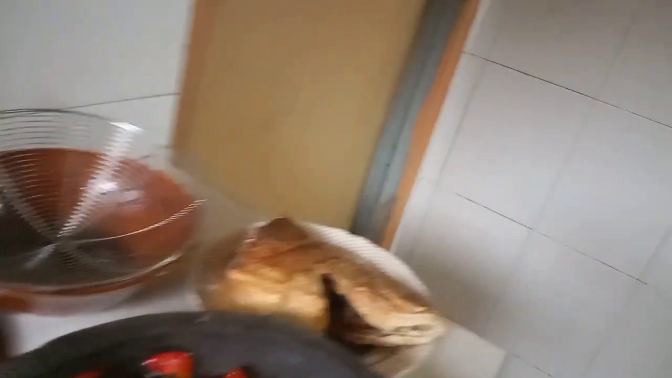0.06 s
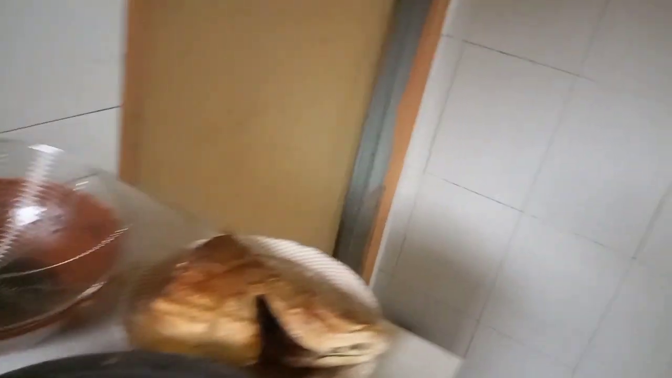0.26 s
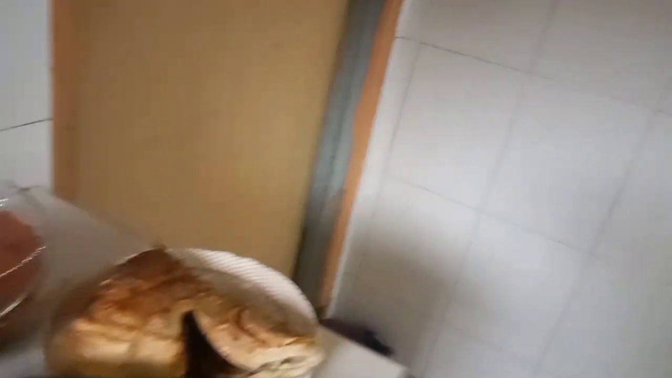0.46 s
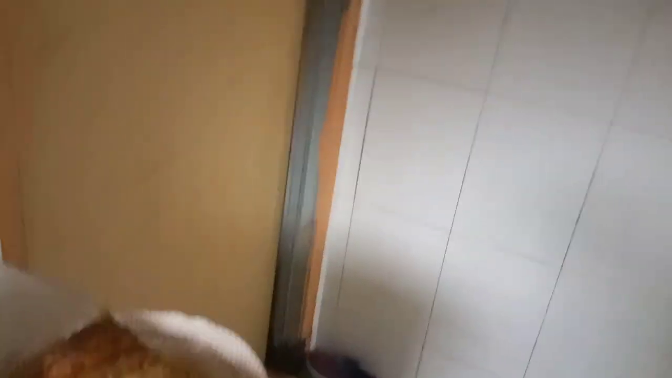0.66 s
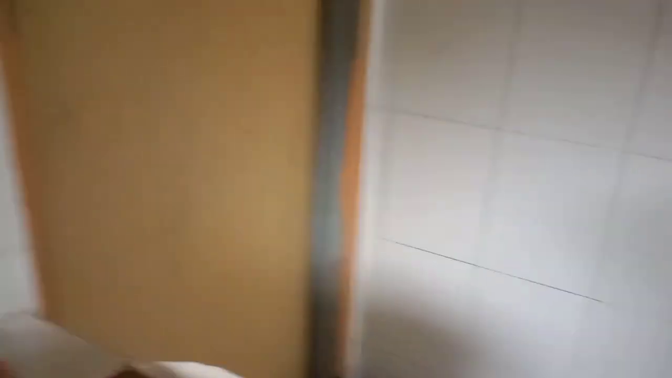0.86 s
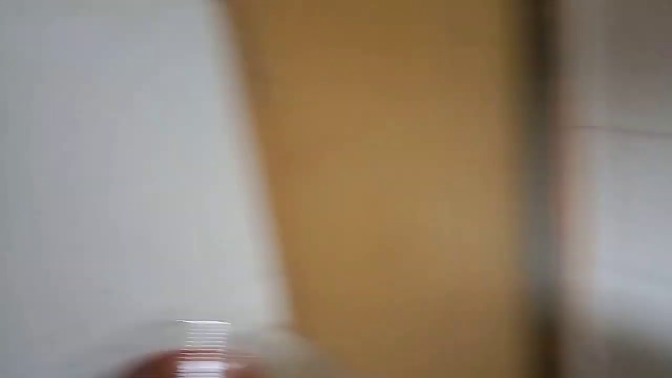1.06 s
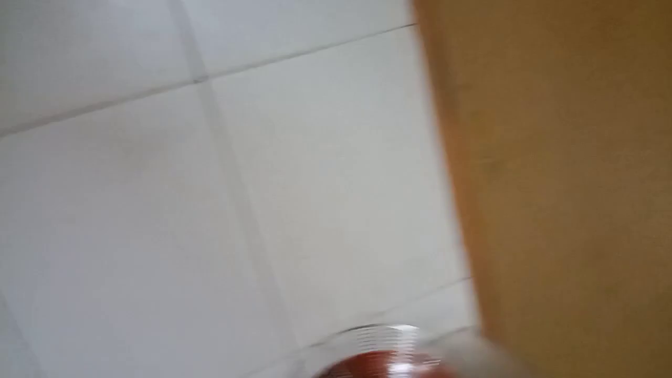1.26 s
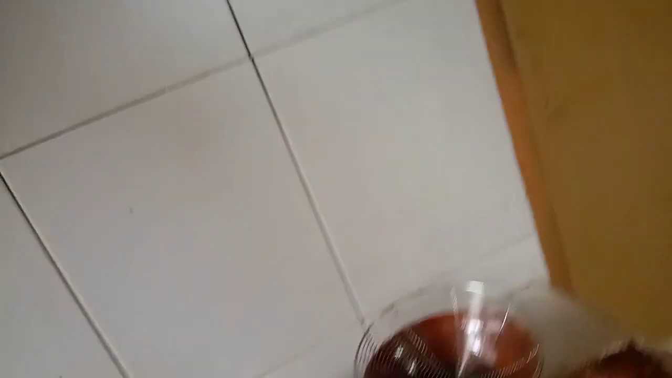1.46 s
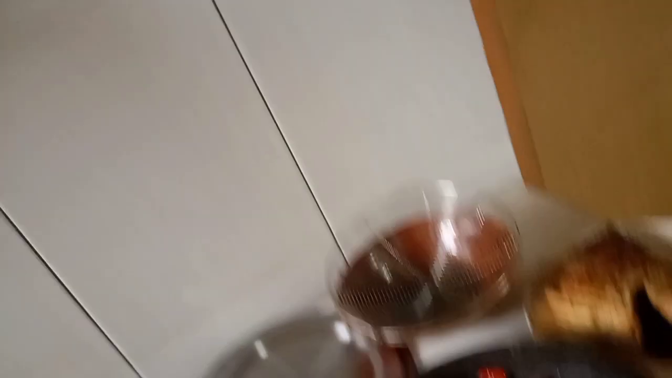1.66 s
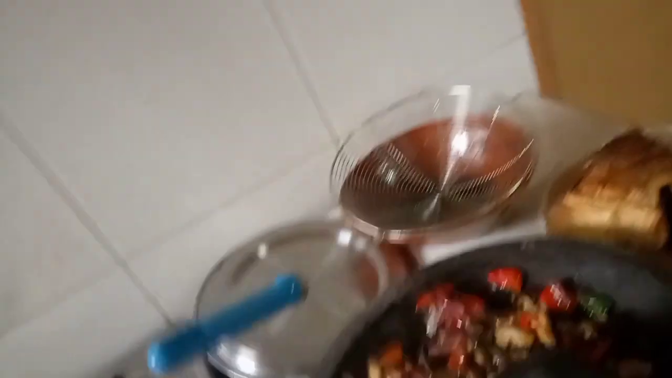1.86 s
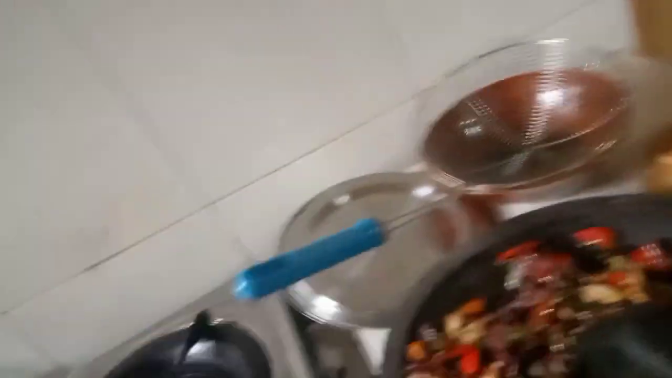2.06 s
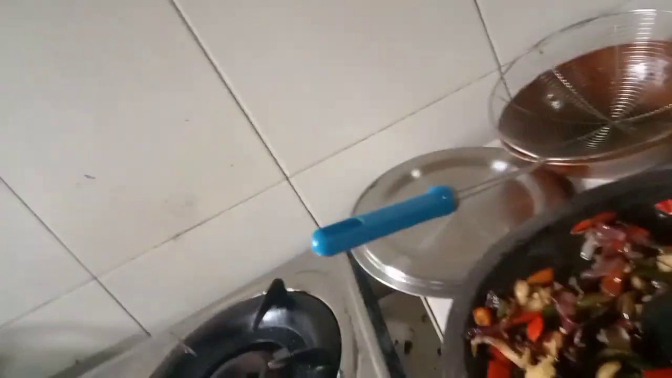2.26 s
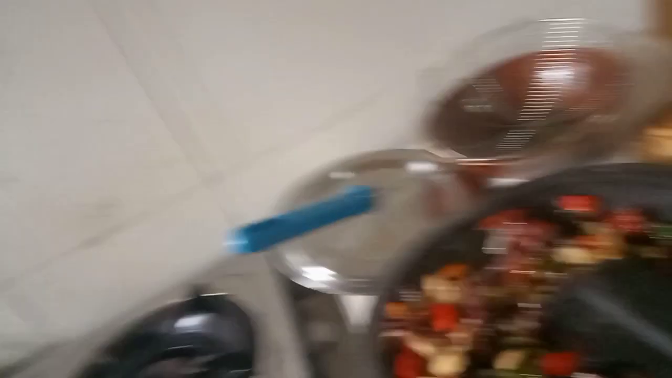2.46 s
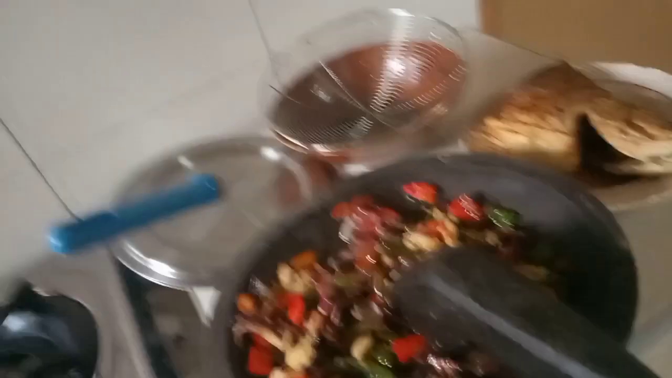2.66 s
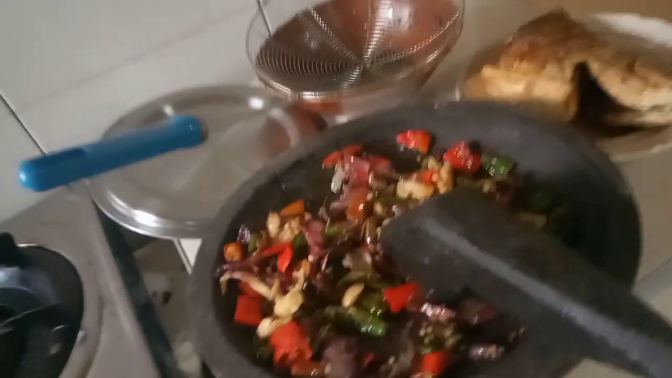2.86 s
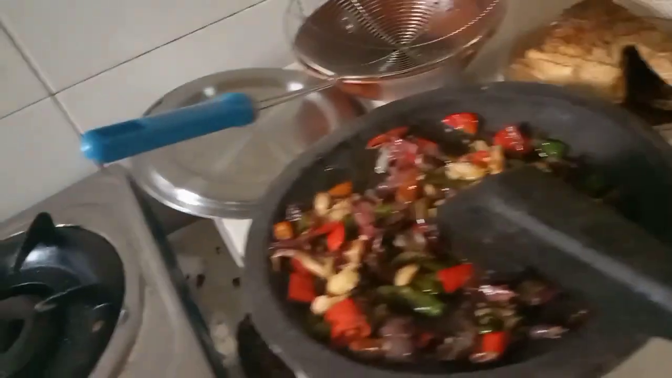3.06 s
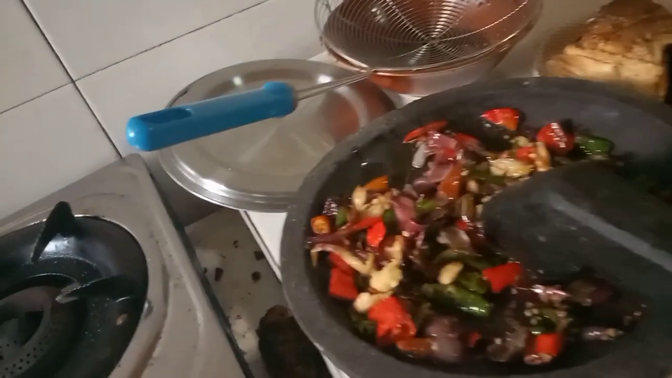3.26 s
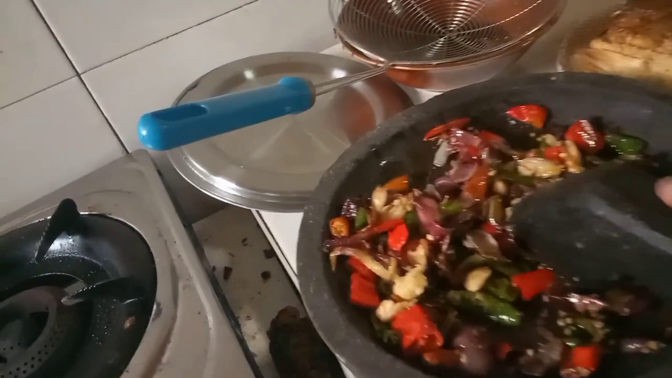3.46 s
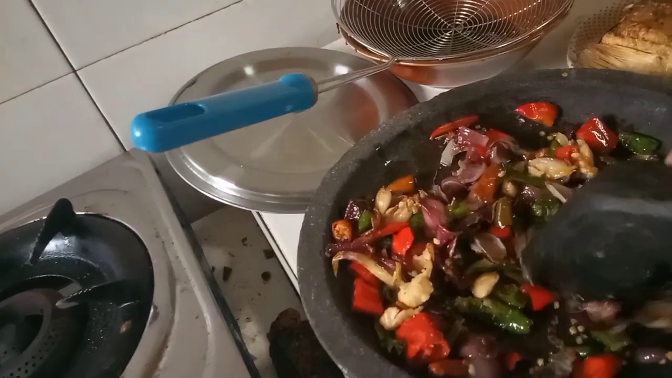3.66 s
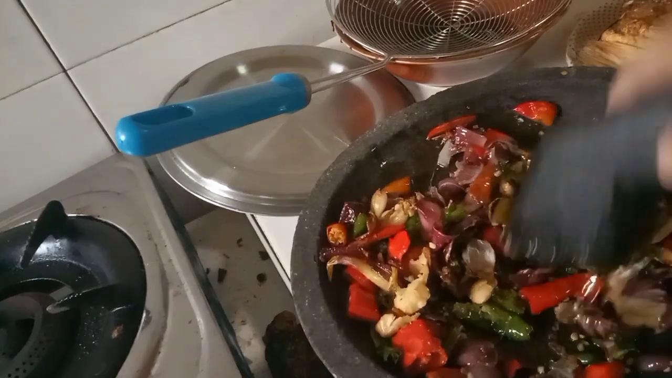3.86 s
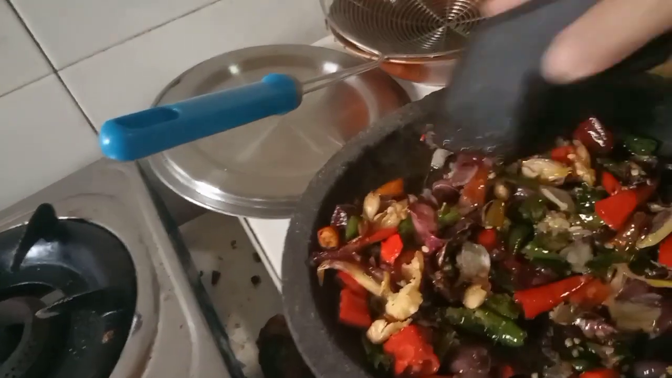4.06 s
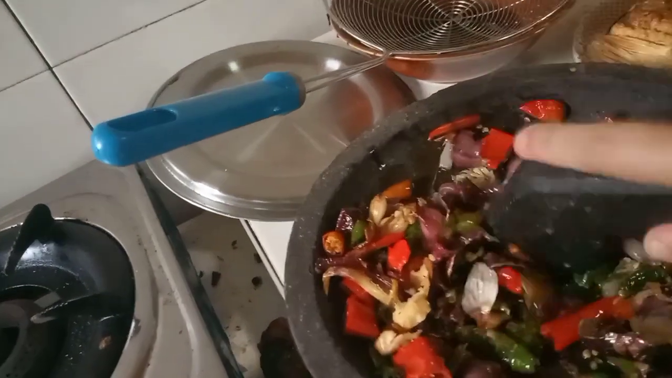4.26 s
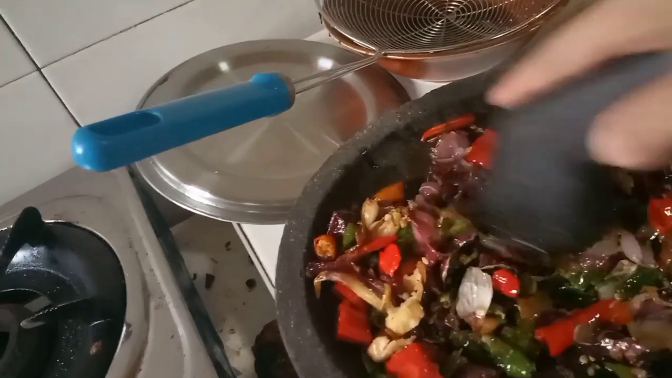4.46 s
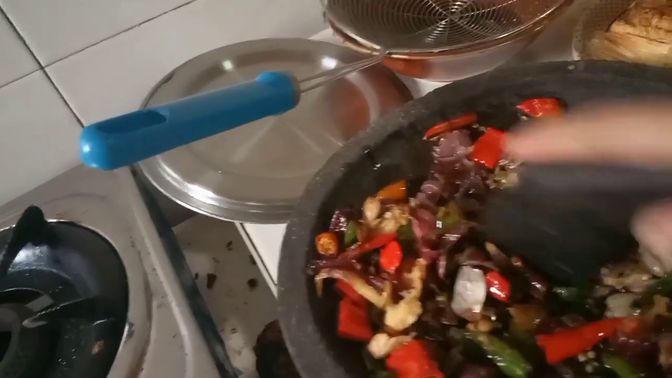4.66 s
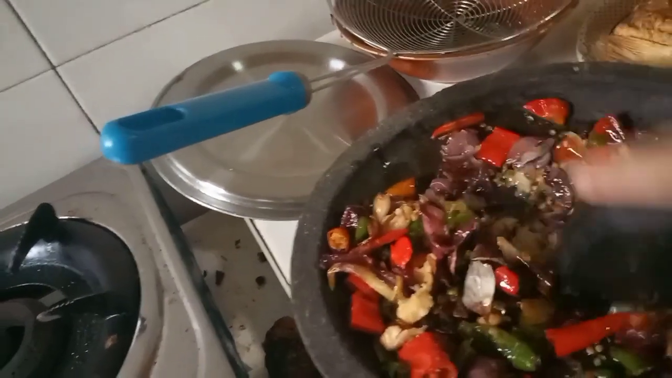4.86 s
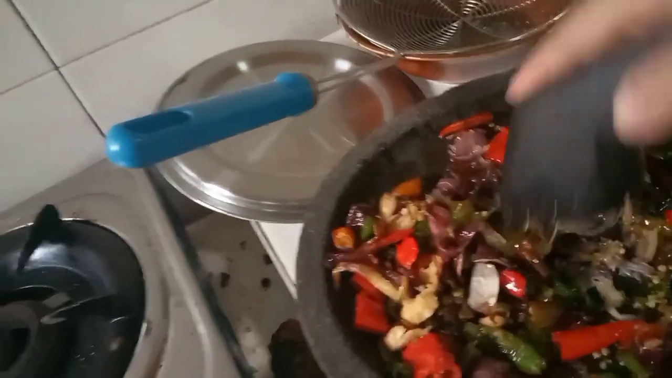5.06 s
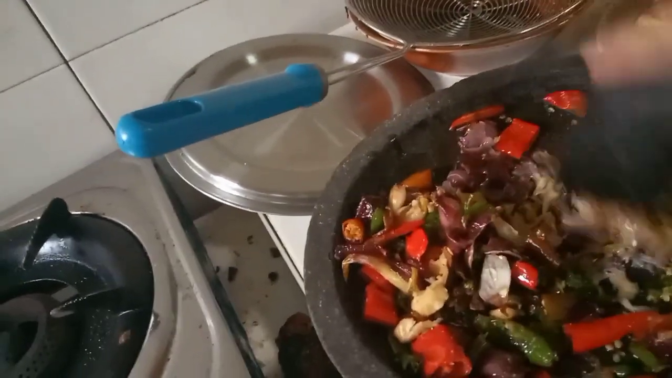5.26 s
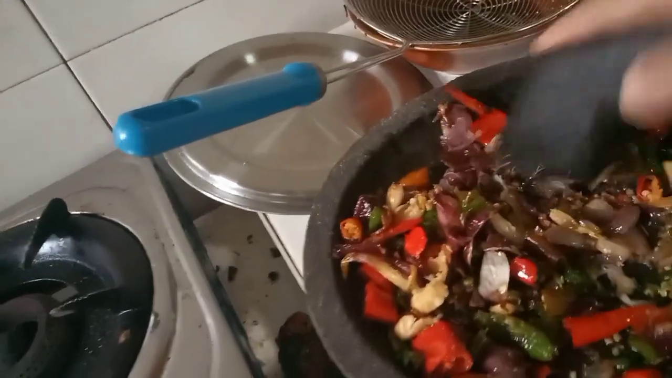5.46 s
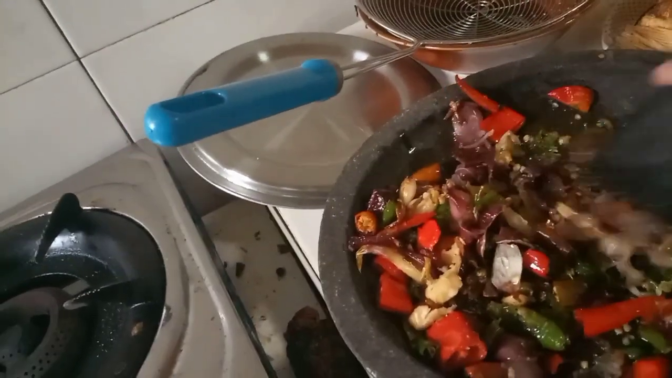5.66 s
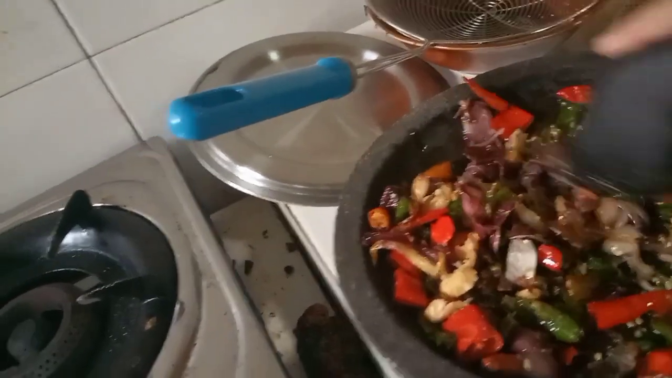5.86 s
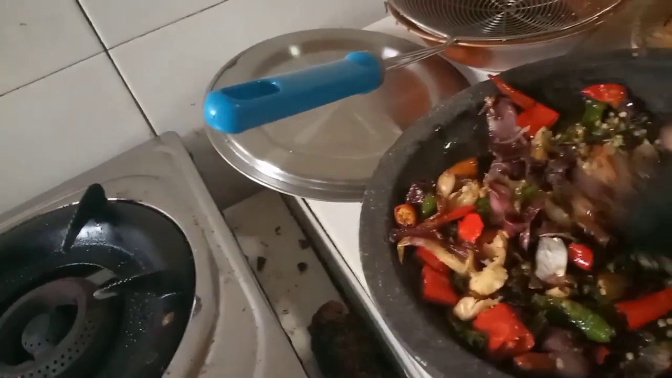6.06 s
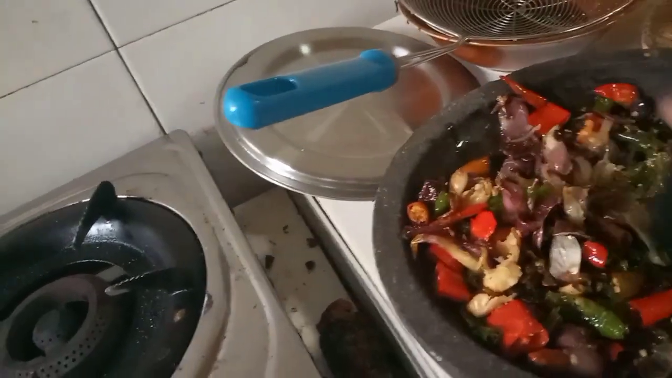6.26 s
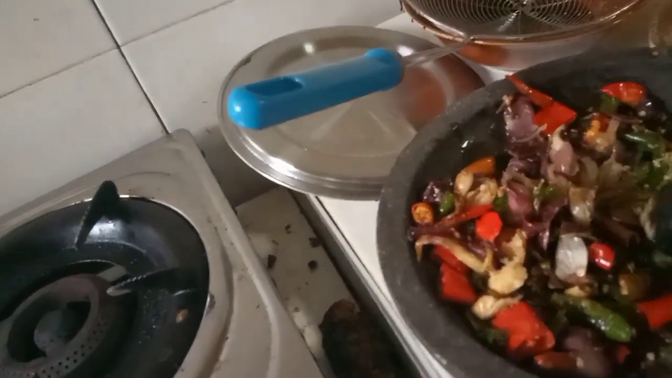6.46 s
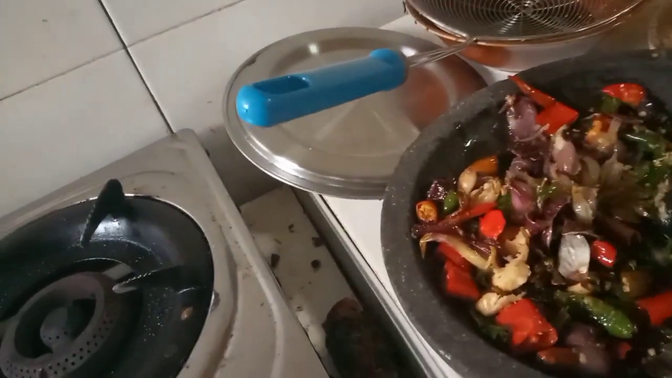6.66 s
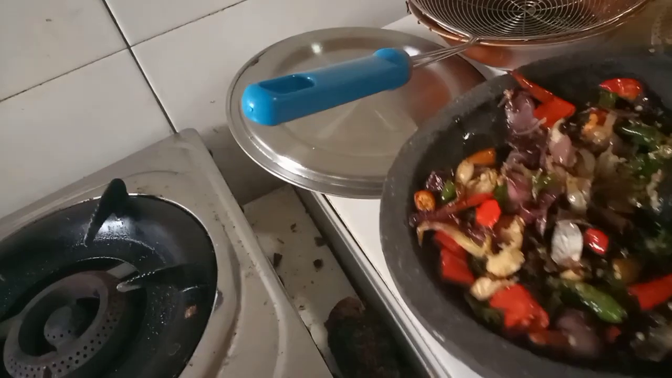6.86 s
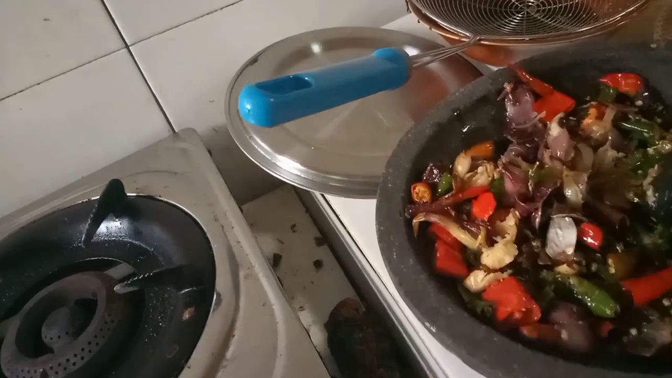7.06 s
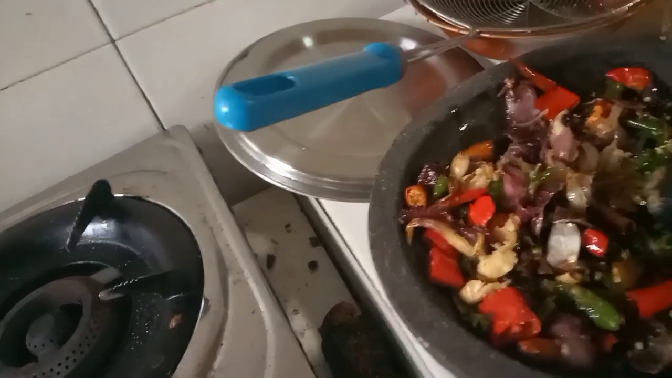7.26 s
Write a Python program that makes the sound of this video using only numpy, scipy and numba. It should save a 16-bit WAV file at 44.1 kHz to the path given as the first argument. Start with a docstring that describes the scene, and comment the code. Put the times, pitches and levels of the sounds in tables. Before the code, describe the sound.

Footsteps slap on tiles, then wet crackling crushing and gritty stone scraping build in a mortar, closing with one loud, ringing stone blow.

```python
"""A small tiled kitchen, heard close up by a phone: a stone pestle crushes chilies and shallots in a stone mortar.
Sandals first clap on the tiles (noise bursts) and heels thump through the floor (decaying sines).
Then skins crack and paste squelches in filtered random grains, while stone drags and knocks on stone
and excites the decaying modes of mortar and counter. The hard walls add a diffuse tail and a low boom,
over faint hiss, rustle and rumble (filtered noise)."""
import sys
import numpy as np
from scipy import signal
from scipy.fft import rfft, irfft
from scipy.io import wavfile
from scipy.ndimage import uniform_filter1d
from numba import njit

SR = 44100
rng = np.random.default_rng(int(sys.argv[2]) if len(sys.argv) > 2 else 0)


def pcm_store(signal):
    """Save signal as 16-bit PCM."""
    levels = np.round(np.clip(np.atleast_2d(signal), -1, 1) * 32767)
    wavfile.write(sys.argv[1], SR, levels.astype(np.int16).T)


N = 322016
T = np.arange(N) / SR

# one table per stroke of the pestle, levels gliding from row to row: time_s, crush_db (paste),
# drag_db (stone on stone), contact_hz, thrust_db (into the counter), boom_db (of the kitchen)
STROKES = [
    [(4.13, -80.5, -84, 1130, -84, -76), (4.162, -59, -83.5, 656, -85, -91),
     (4.182, -58.5, -65, 607, -82, -66), (4.218, -46, -49, 577, -63, -52), (4.242, -40, -57, 655, -60, -75),
     (4.268, -38.5, -61, 1280, -69, -50), (4.3, -52, -64.5, 1210, -69, -70),
     (4.32, -50, -71.5, 991, -49, -55)],
    [(4.32, -53.5, -72, 1110, -60, -54), (4.352, -51.5, -76, 1213, -62, -46.5),
     (4.368, -35.5, -64, 1240, -59, -59), (4.384, -42.5, -77, 566, -63, -59),
     (4.414, -50.5, -76, 535, -59, -55), (4.44, -40.5, -47.5, 535, -48, -48),
     (4.492, -62, -46.5, 596, -49.5, -41), (4.53, -59.5, -53.5, 598, -61, -73)],
    [(4.53, -54, -61, 565, -65, -63), (4.57, -44, -70, 1505, -52, -62), (4.59, -29, -53.5, 1510, -66, -63),
     (4.63, -41.5, -47, 1440, -47, -56), (4.698, -40.5, -56, 949, -47, -45.5),
     (4.708, -35.5, -39, 1090, -59, -58), (4.754, -53.5, -45, 746, -54, -70),
     (4.86, -71, -71, 565, -69, -73)],
    [(4.86, -69, -69, 1073, -65, -72), (4.906, -37.5, -59, 910, -48, -44.5),
     (4.942, -39.5, -32.5, 940, -41.5, -46), (5.004, -38.5, -41.5, 837, -44, -41),
     (5.038, -41.5, -37, 536, -40, -56), (5.096, -62.5, -44.5, 610, -43.5, -52),
     (5.158, -70, -70, 528, -81, -77), (5.2, -66.5, -81, 1050, -76, -57)],
    [(5.2, -64, -82, 1120, -70, -84), (5.24, -45, -32, 1150, -30.5, -29),
     (5.304, -33.5, -26, 675, -33, -34.5), (5.354, -37.5, -39, 775, -35, -46),
     (5.408, -35.5, -32.5, 1140, -33.5, -46), (5.446, -34, -41.5, 770, -42, -65),
     (5.484, -43, -31.5, 560, -38, -59), (5.58, -66, -55, 646, -66, -57)],
    [(5.58, -58.5, -55.5, 570, -56, -73), (5.638, -46, -59.5, 522, -61, -47),
     (5.698, -38, -63, 969, -51, -52), (5.738, -40.5, -35, 970, -49, -37),
     (5.794, -42.5, -43, 546, -43, -37.5), (5.826, -50.5, -31.5, 550, -41, -37.5),
     (5.902, -66, -63.5, 573, -52, -74), (6.0, -80, -85, 998, -68, -78)],
    [(6.0, -76, -95, 944, -69, -71), (6.02, -18, -42, 932, -51, -58), (6.04, -43.5, -30, 890, -37, -52),
     (6.08, -32.5, -33.5, 1020, -29, -46), (6.106, -28, -31, 990, -34.5, -50),
     (6.156, -38, -35.5, 659, -32.5, -34.5), (6.23, -41.5, -45, 725, -49, -42.5),
     (6.3, -69, -71, 588, -61, -59)],
    [(6.3, -81.5, -71, 771, -66, -61), (6.328, -27, -70, 905, -43, -57), (6.342, -40.5, -42, 935, -49, -42),
     (6.378, -45.5, -34.5, 930, -35.5, -35.5), (6.452, -59.5, -52.5, 621, -43, -58),
     (6.498, -70, -81, 622, -69, -75), (6.532, -64.5, -77, 1060, -68, -82), (6.56, -79, -75, 983, -63, -53)],
]
# stone meeting stone: contact_s, peak_db, tilt_db_per_octave (hardness), counter_db (relative)
KNOCKS = [(4.184, -43.5, -3, -11), (4.43, -35, -9, -5), (4.586, -55, -23, -9.0), (4.706, -29.5, 13.5, -21),
          (4.739, -28.5, -10.5, -12), (4.912, -36.5, -4, -15), (4.94, -31.5, -4.5, -0.5),
          (5.041, -37, -11, -8), (5.229, -32.5, -3, 10), (5.278, -23, -1, -8), (5.297, -27, -7.5, -5),
          (5.398, -26, -5.5, -9.5), (5.473, -28.5, 0, -1.5), (5.719, -35, -5.5, -16.5),
          (5.817, -37.5, -12, -14.5), (6.022, -20.5, 3.5, -18), (6.343, -36.5, -5, -12),
          (6.359, -32.5, -5.5, -13), (6.583, -2, 0, -18.5)]
# heels on the floor: start_s, peak_db, pitch_hz, overtone_share
THUMPS = [(1.92, -30.5, 89.7, 0.46), (1.949, -34, 144.4, 0.73), (2.057, -38, 97, 1),
          (2.265, -44.5, 75.4, 0.57), (2.756, -31, 100.2, 0.22), (2.844, -34.5, 85.5, 0.39)]
# decaying modes of the mortar: mode_hz, level_db (relative), t60_s
MORTAR_MODES = [(539, -4, 0.063), (630, 1, 0.01), (810, -13.5, 0.051), (1101, 1, .04), (1005, 8.5, 0.052),
                (1230, -4.5, 0.048), (1299, -8.5, 0.13), (1540, -8, 0.035), (1915, -10.5, 0.073),
                (2260, -40, .04), (3140, -23, .06), (4330, -28, .3)]
# decaying modes of the counter: mode_hz, level_db (relative), t60_s
COUNTER_MODES = [(69, -7, 0.11), (116.5, 2, 0.058), (141, -1.5, 0.087), (195, -4.5, 0.19),
                 (269, -3.5, 0.07), (315, -4.5, 0.083), (350.4, -5.5, 0.047)]
# spectrum of the wet paste: frequency_hz, density_db (per Hz, relative)
PASTE_SPECTRUM = [(880, -28), (1500, -3), (1820, -11), (2180, -13.5), (2770, -7), (3300, -3), (4160, -15),
                  (5370, -2.5), (7630, -3.5), (9000, -23.5), (11700, -31.5), (19800, -120)]
# spectrum of the sizzle in the high treble: frequency_hz, density_db (per Hz, relative)
SIZZLE_SPECTRUM = [(5290, -23), (9000, -1), (10300, -3.5), (13200, -8.5), (14900, 4.5), (16000, -21)]


def undb(db):
    """Level law: decibels to amplitude ratio."""
    return 10 ** (np.asarray(db) / 20)


def unit(x):
    """Power normalization: scale to rms 1."""
    return x / np.sqrt(np.mean(x ** 2))


def colour(x, spectrum):
    """Minimum-phase filtering: energy comes as early as the spectrum allows, so hits stay sharp."""
    hz, db = np.transpose(spectrum)
    size = 2 ** 11
    bin_hz = np.arange(size // 2 + 1) * SR / size
    log_gain = np.interp(np.log(bin_hz + 1), np.log(hz), db) * np.log(10) / 20
    # folding the cepstrum onto positive time makes the response causal
    cepstrum = irfft(log_gain)
    cepstrum[1:size // 2] *= 2
    cepstrum[size // 2 + 1:] = 0
    response = irfft(np.exp(rfft(cepstrum)))
    return signal.fftconvolve(x, response / np.sqrt(np.sum(response ** 2)))[:len(x)]


def tilted(spectrum, tilt_db, pivot_hz):
    """Spectral slope: lean a spectrum by dB per octave about a pivot."""
    return [(hz, db + tilt_db * np.log2(hz / pivot_hz)) for hz, db in spectrum]


def ring(force, modes):
    """Modal superposition: a struck body answers with the sum of its decaying modes."""
    t = T[T < max(t60 for _, _, t60 in modes)]
    response = np.zeros(len(t))
    for k, (hz, db, t60) in enumerate(modes):
        # neighbouring modes alternate in sign
        response += undb(db - 60 * t / t60) * np.sin(2 * np.pi * hz * t + np.pi * k)
    return signal.fftconvolve(force, response / np.abs(response).max())[:len(force)]


def band(x, hz, width_hz):
    """Simple resonance: one peak with Q = centre / width."""
    b, a = signal.iirpeak(min(hz, SR / 3), hz / width_hz, SR)
    return signal.lfilter(b, a, x)


@njit
def sweep(x, hz, q):
    """Moving resonance: a state-variable band-pass whose centre changes from sample to sample."""
    y, band_state, low_state = np.empty(len(x)), 0., 0.
    for i in range(len(x)):
        g = np.tan(np.pi * hz[i] / SR)
        v = (band_state + g * (x[i] - low_state)) / (1 + g * (g + 1 / q))
        band_state = 2 * v - band_state
        low_state = low_state + 2 * g * v
        y[i] = v / q
    return y


def grains(rate, scatter_db):
    """Shot noise: random clicks, rate per second, whose sizes have a long tail; rms 1."""
    when = rng.random(N) < rate / SR
    size = rng.exponential(1, N)
    sign = rng.standard_normal(N)
    return unit(when * sign * undb(scatter_db * np.minimum(size, 4.5)))


def walk(rate):
    """Slow random modulation: levels drawn rate times a second, smoothed twice; rms 1."""
    k = int(SR / rate)
    held = np.repeat(rng.standard_normal(N // k + 1), k)
    return unit(uniform_filter1d(uniform_filter1d(held, k), k)[:N])


def add(out, s, piece):
    """Linear superposition: lay a sound on the time line."""
    i = int(s * SR)
    out[i:i + len(piece)] += piece[:N - i]


def burst(x, decay_s, rise_s):
    """Transient envelope: exponential approach and exponential decay, peak 1."""
    t = T[:len(x)]
    shaped = x * (1 - np.exp(-t / rise_s)) * np.exp(-t / max(decay_s, 1e-4))
    return shaped / np.abs(shaped).max()


def pressing(column):
    """Applied load: one level column of the strokes as gain, negligible before and after them."""
    rows = np.concatenate(STROKES)
    return undb(np.interp(T, rows[:, 0], rows[:, column], left=-120, right=-120))


def quiet():
    """Background noise: flickering hiss and rustle, wavering boom and slow rumble; strokes swell the last two."""
    # boom of the kitchen and rumble of the hand on the phone: time_s, boom_db, rumble_db
    stir = [(0.0, -88, -99), (0.28, -76.5, -92), (0.34, -63.5, -83), (0.53, -55, -81), (0.65, -81, -83),
            (1.14, -70.5, -68), (1.4, -74.5, -85.5), (1.8, -82.5, -88), (2.05, -72, -62), (2.22, -67, -75),
            (2.38, -60.5, -83), (2.52, -78, -82.5), (3.09, -79.5, -90), (3.45, -61, -76.5),
            (3.88, -77.5, -83), (3.98, -62.5, -91), (4.09, -88, -93.5), (6.72, -82, -79), (6.83, -41, -84),
            (7.0, -81, -96), (7.12, -81.5, -85), (7.17, -64.5, -65), (7.3, -64, -79.5)]
    # spectrum of the hiss: frequency_hz, density_db (per Hz, relative)
    hiss_spectrum = [(35, -49), (60, -17), (139, -7.5), (244, -4), (540, -8), (1340, -2.5), (2000, -13.5),
                     (3340, -13.5), (4120, -19), (6000, -8.5), (6580, 1.5), (10300, -11), (11300, -25.5),
                     (14900, -17), (16000, -31.5)]
    # soft rustle in the lower treble: time_s, level_db
    rustle_levels = [(0, -75), (0.5, -68.5), (1.0, -75), (2.9, -68), (3.1, -57.5), (3.3, -70.5),
                     (3.65, -70), (3.8, -59), (4.0, -69), (4.2, -80.5), (7.3, -80)]
    s, boom_db, rumble_db = np.transpose(stir)
    hiss = unit(colour(rng.standard_normal(N), hiss_spectrum))
    hiss_gain = undb(-54 + .5 * walk(9.5))
    boom_hz = 139.6 + 2.92 * walk(21)
    boom = np.sqrt(2) * np.sin(2 * np.pi * np.cumsum(boom_hz) / SR)
    boom_gain = undb(np.interp(T, s, boom_db)) + pressing(column=5)
    rumble = unit(band(band(rng.standard_normal(N), 50, 60), 50, 60))
    rumble_gain = undb(np.interp(T, s, rumble_db)) + undb(-15) * pressing(column=4)
    rustle = unit(band(band(rng.standard_normal(N), 5400, 1200), 5400, 1200))
    rustle_gain = undb(np.interp(T, *np.transpose(rustle_levels)) + 3.0 * walk(25))
    return hiss * hiss_gain + boom * boom_gain + rumble * rumble_gain + rustle * rustle_gain


def taps():
    """Free decay: a small hollow thing sounds one damped sine somewhere off in the house."""
    # faint far-off taps: start_s, peak_db, pitch_hz
    tap_events = [(1.166, -56, 700)]
    out, t = np.zeros(N), T[:SR // 5]
    for s, db, hz in tap_events:
        add(out, s, undb(db) * burst(np.sin(2 * np.pi * hz * t), decay_s=0.026, rise_s=.008))
    return out


def slaps():
    """Air expulsion and cavity resonance: the sole claps out air, a trapped pocket sounds hollow, heels thump.

    Returns the claps and the short thumps that come through the floor."""
    # sandals on the tiles: start_s, peak_db, decay_s, tilt_db_per_octave, hollow_hz, hollow_db (relative)
    slap_events = [(1.917, -10.5, 0.028, 3, 902, -26.5), (1.927, -21.5, 0.02, -0.4, 912, -9.5),
                   (2.053, -34.5, 0.02, 1, 902, -7), (2.069, -34, 0.02, -2.5, 1194, -5.5),
                   (2.259, -39.5, 0.025, -1, 999, -10.5), (2.752, -17.5, 0.018, -1, 546, -6),
                   (2.761, -14, 0.039, 3, 956, -3.5), (2.838, -15, 0.022, 1.4, 732, -6)]
    # spectrum of the clapping sole: frequency_hz, density_db (per Hz, relative)
    sole_spectrum = [(180, -38.5), (300, -24), (392, -7), (478, -15.5), (725, -3), (1300, -4), (2170, -8.5),
                     (2360, -12), (3080, -9), (4300, -19), (5160, -8), (6740, -7.5), (9090, -24),
                     (14700, -25), (16000, -15)]
    claps, thumps, t = np.zeros(N), np.zeros(N), T[:SR // 5]
    for s, db, decay_s, tilt_db, hollow_hz, hollow_db in slap_events:
        # the level jumps every 100 samples
        uneven_db = 3 * np.repeat(rng.standard_normal(len(t) // 100 + 1), 100)[:len(t)]
        flap = rng.standard_normal(len(t)) * undb(uneven_db)
        hollow = unit(band(flap, hollow_hz, .5 * hollow_hz))
        clap = colour(flap, tilted(sole_spectrum, tilt_db, 2000)) + undb(hollow_db) * hollow
        add(claps, s, undb(db) * burst(clap, decay_s, rise_s=0.00091))
    for s, db, hz, overtone in THUMPS:
        thump = np.sin(2 * np.pi * hz * t) + overtone * np.sin(2 * np.pi * 2.6 * hz * t)
        add(thumps, s, undb(db) * burst(thump, decay_s=0.0095, rise_s=0.016))
    return claps, thumps


def kitchen(x):
    """Diffuse reverberation: tiled walls return a dense tail with its own decay time in each band."""
    # reverberation of the room: band_hz, t60_s
    reverberation = [(100, 0.59), (500, 0.62), (2000, 0.28), (5000, 0.48), (12000, 0.58)]
    t = T[:SR // 2]
    tail = np.zeros(len(t))
    for hz, t60 in reverberation:
        tail += band(rng.standard_normal(len(t)), hz, 1.42 * hz) * undb(-60 * t / t60)
    tail *= np.clip(t / 0.012 - .5, 0, 1)  # the first echoes need a few ms
    return signal.fftconvolve(x, tail / np.sqrt(np.sum(tail ** 2)))[:N]


def booms():
    """Room modes: every knock and heel thump sets the lowest resonances of the kitchen ringing."""
    # lowest resonances, close enough to beat: mode_hz, level_db (relative), t60_s
    room_modes = [(141.1, 1, 0.47), (147.3, -1.5, 0.44)]
    push = np.hanning(200) / 100  # a soft shove of about 4.5 ms
    shove = np.zeros(N)
    for s, db, _, counter_db in KNOCKS:
        add(shove, s, undb(db + counter_db - 11.5) * push)
    for s, db, _, _ in THUMPS:
        add(shove, s, undb(db - 18.5) * push)
    return ring(shove, room_modes)


def cracks():
    """Brittle fracture: each skin or seed splits in a very short noise burst with its own pitch."""
    # skins and seeds cracking: start_s, peak_db, centre_hz, decay_s
    crack_events = [(3.712, -41, 6660, 0.005), (3.7304, -36.5, 3260, 0.005), (3.8863, -37.5, 6450, 0.0055),
                    (4.16, -41, 6200, 0.005), (4.2383, -34.5, 4890, 0.005), (4.364, -32.5, 3120, 0.0061),
                    (4.4069, -36, 3160, 0.005), (4.5304, -34, 2750, 0.0092), (4.552, -31.5, 3040, 0.005),
                    (4.5897, -14, 4050, 0.007), (4.7072, -30.5, 3340, 0.0046),
                    (4.8623, -36.5, 6630, 0.0063), (4.9007, -18.5, 6470, 0.0054),
                    (4.9468, -25, 5830, 0.0058), (4.979, -26.5, 5490, 0.005), (5.0094, -26, 3190, 0.005),
                    (5.0194, -28, 5240, 0.005), (5.221, -35, 2900, 0.0072), (5.2415, -26, 6400, 0.005),
                    (5.2766, -25, 3100, 0.0075), (5.2914, -29, 5500, 0.005), (5.4326, -21, 3440, 0.005),
                    (5.4401, -20.5, 5450, 0.005), (5.4534, -19.5, 5440, 0.0046),
                    (5.6042, -30.5, 6000, 0.0044), (5.664, -34, 5300, 0.0046), (5.673, -28.5, 5400, 0.005),
                    (5.697, -27, 6200, 0.0026), (5.7106, -24, 5870, 0.0035), (5.7755, -23.5, 6060, 0.0038),
                    (6.0192, -10.5, 5200, 0.0035), (6.0846, -26, 5430, 0.0039), (6.103, -20, 5800, 0.0056),
                    (6.1892, -26, 3500, 0.0046), (6.2302, -28, 5800, 0.005), (6.3245, -15.5, 5400, 0.0027),
                    (6.4673, -37.5, 6900, 0.005), (6.5201, -43, 5710, 0.005)]
    out, noise = np.zeros(N), rng.standard_normal(N)
    paste, sizzle = colour(noise, PASTE_SPECTRUM), colour(noise, SIZZLE_SPECTRUM)
    for s, db, hz, decay_s in crack_events:
        now = slice(int(s * SR), int(s * SR) + SR // 10)
        pitched = band(band(noise[now], hz, .5 * hz), hz, .5 * hz)
        spray = unit(0.17 * paste[now] + pitched) + undb(-22) * sizzle[now]
        add(out, s, undb(db) * burst(spray, decay_s, rise_s=0.00047))
    return out


def strokes():
    """Granular crushing and stick-slip friction: paste bursts in grains, rough stone drives mortar and counter."""
    # what each stroke meets in the paste: centre_hz, sizzle_db (above 9 kHz, relative)
    mixes = [(4890, -10), (3900, -11), (4230, -12.5), (5200, -9.5), (5450, -9.5), (5720, -8.5), (5300, -12),
             (5400, -3.5)]
    # spectrum of the gritty drag: frequency_hz, density_db (per Hz, relative)
    grit_spectrum = [(150, -32.5), (250, -3), (462, -3), (533, 3.5), (735, -10.5), (949, -5), (1210, -1.5),
                     (2060, -17.5), (2400, -19), (3120, -49.5), (5280, -120)]
    s, *columns = np.concatenate(STROKES).T
    crush_db, drag_db, drag_hz, *_ = (np.interp(T, s, c) for c in columns)
    starts = [rows[0][0] for rows in STROKES]
    stroke = np.clip(np.searchsorted(starts, T) - 1, 0, None)
    crush_hz, sizzle_db = np.array(mixes, float)[stroke].T.copy()

    juice = (grains(2400, 3.1) + .7 * rng.standard_normal(N)) * undb(2.94 * walk(60))
    squelch = colour(juice, PASTE_SPECTRUM)
    # small wet pockets pop at a pitch that jumps every 15 ms or so
    jumps_hz = 4200 * np.exp(0.44 * rng.standard_normal(N // 660 + 1))
    pockets_hz = np.clip(np.repeat(jumps_hz, 660)[:N], 1500, 9000)
    crushed = sweep(squelch, crush_hz, 1.3)
    pockets = sweep(squelch, pockets_hz, 4.7)
    sizzle = unit(colour(juice, SIZZLE_SPECTRUM))
    paste = unit(0.74 * squelch + crushed + 1.5 * pockets) + undb(sizzle_db) * sizzle

    slips = (grains(1500, 2.2) + 0.57 * rng.standard_normal(N)) * undb(2.3 * walk(40))
    grit = colour(slips, grit_spectrum)
    # the pitch of the drag moves with the contact
    contact = sweep(grit, drag_hz, 4.4)
    stone = unit(0.57 * grit + contact + 0.24 * unit(ring(slips, MORTAR_MODES)))
    counter = unit(ring(grains(820, 2.3), COUNTER_MODES))
    working = (T > s[0]) & (T < s[-1])
    return working * (undb(crush_db) * paste + undb(drag_db) * stone) + pressing(column=4) * counter


def knocks():
    """Impact excitation: an edge touches, the full face lands and chatters; mortar and counter ring.

    Returns the blows and their smoother share that spreads to the walls."""
    # the many close modes of the mortar: frequency_hz, density_db (per Hz, relative)
    stone_spectrum = [(150, -40), (250, -9), (427, -10), (494, -6), (705, -8), (829, -6), (1180, 1),
                      (1690, -8.5), (1900, -2), (2090, -17), (3200, -20.5), (3650, -29), (4330, -21.5),
                      (5000, -31.5), (5400, -25.5), (6500, -22.5), (12000, -52), (15600, -90),
                      (22000, -120)]
    out, spread, push = np.zeros(N), np.zeros(N), np.zeros(N)
    lead, t = .003, T[:SR // 10]  # s from the start of the piece to the full landing
    edge = 0.27 * np.exp(-((t - .0005) / 0.0001) ** 2)
    landing = edge + np.exp(-((t - lead) / 0.00013) ** 2)
    for s, db, tilt_db, counter_db in KNOCKS:
        chatter = burst(rng.standard_normal(len(t)), decay_s=.004, rise_s=.002)
        # each blow excites the modes in another mix
        mix = tilted([(hz, g + 2 * rng.standard_normal()) for hz, g, _ in MORTAR_MODES], tilt_db, 1000)
        modes = [(hz, g, t60) for (hz, g), (_, _, t60) in zip(mix, MORTAR_MODES)]
        body = ring(landing + 0.085 * chatter, modes)
        stone = tilted(stone_spectrum, tilt_db, 1000)
        hit = .5 * unit(colour(chatter, stone)) + unit(body)
        add(out, s - lead, undb(db) * hit / np.abs(hit).max())
        add(spread, s, undb(db + 16.0) * colour(1. * (t == 0), stone))
        add(push, s, undb(db + counter_db) * np.hanning(100) / 50)  # a soft shove of about 2 ms
    counter = ring(push, COUNTER_MODES)
    return out + counter, spread + out / 10 + counter


def scene():
    """Superposition of direct sound, reverberation, room modes and background."""
    near = strokes() + cracks()
    blows, spread = knocks()
    claps, thumps = slaps()
    wet = kitchen(undb(-16) * near + spread + undb(-5.0) * claps + undb(-10) * thumps)
    return (near + blows + claps + thumps + taps() + wet + booms() + quiet())[None]


def suppress(x):
    """Spectral subtraction: bands near their usual quiet level are turned down, which chops the tails."""
    margin_db, floor_db = 11.5, -8.5
    spec = signal.stft(x, nperseg=1024)[2]
    power = uniform_filter1d(np.abs(spec) ** 2, size=9, axis=-2)  # over frequency
    power = uniform_filter1d(power, size=4, axis=-1)  # over time
    usual = np.percentile(power, 30, axis=-1, keepdims=True)
    gain = np.clip(1 - undb(margin_db) ** 2 * usual / power, undb(floor_db), 1)
    gain[:, :5] = 1  # the deep bass passes untouched
    return signal.istft(spec * gain, nperseg=1024)[1][:, :N]


def record(dry):
    """Band limitation: the phone suppresses steady noise and cuts the deepest bass and the top."""
    low_cut = signal.butter(4, 52, "high", fs=SR, output="sos")
    top_cut = signal.ellip(10, .2, 80, 15500, fs=SR, output="sos")
    return signal.sosfilt(top_cut, signal.sosfilt(low_cut, suppress(dry)))


dry = scene()
out = record(dry)
pcm_store(out)
```